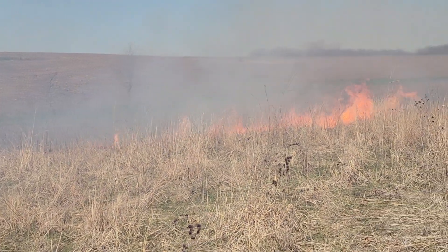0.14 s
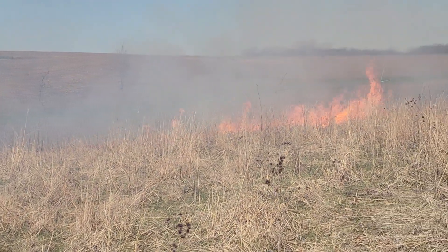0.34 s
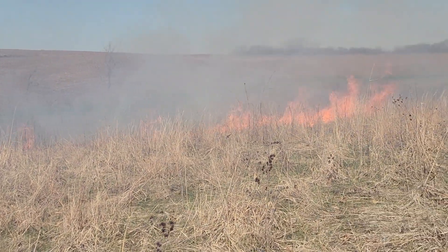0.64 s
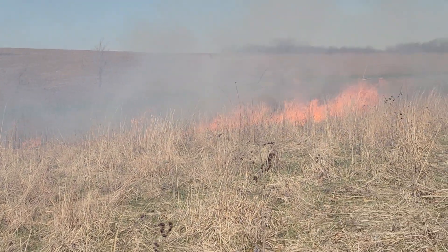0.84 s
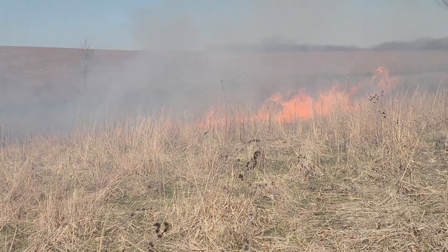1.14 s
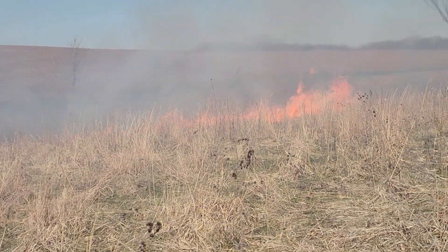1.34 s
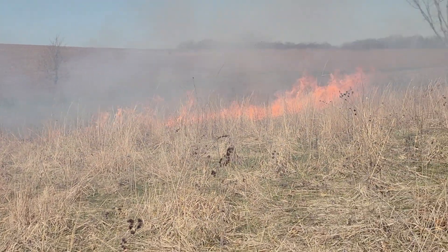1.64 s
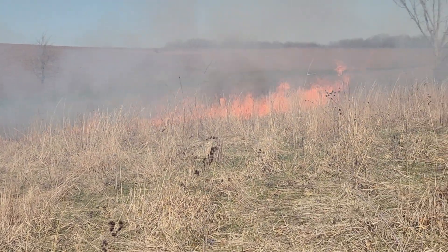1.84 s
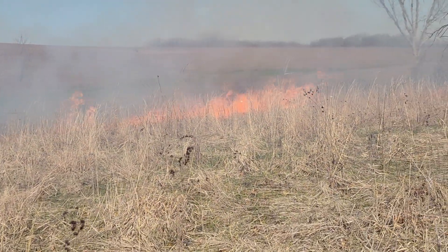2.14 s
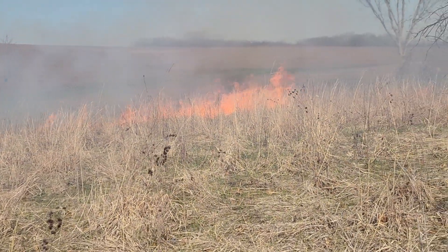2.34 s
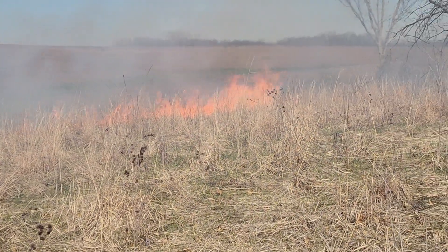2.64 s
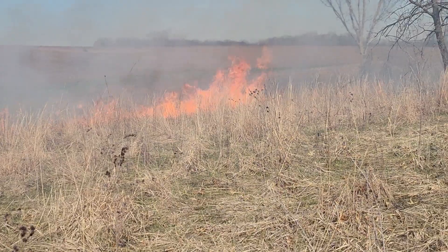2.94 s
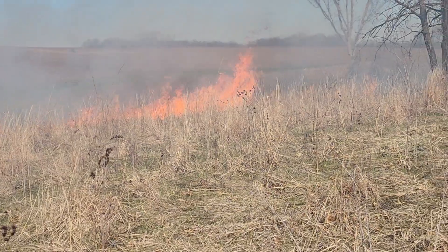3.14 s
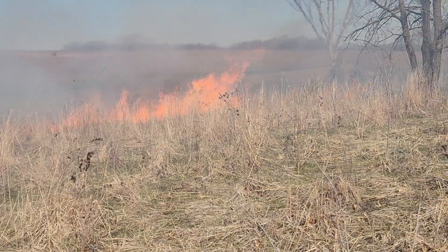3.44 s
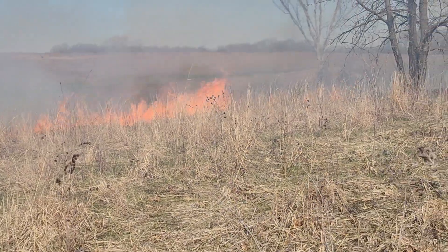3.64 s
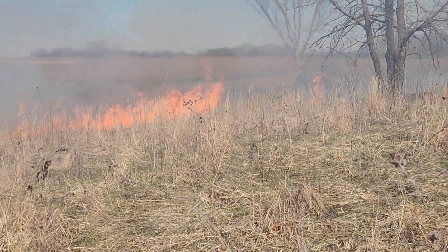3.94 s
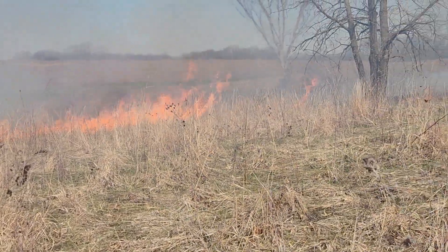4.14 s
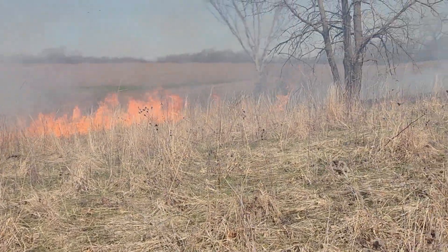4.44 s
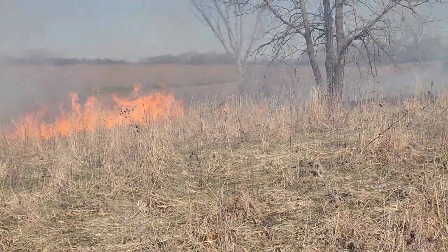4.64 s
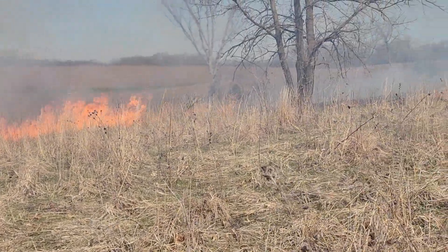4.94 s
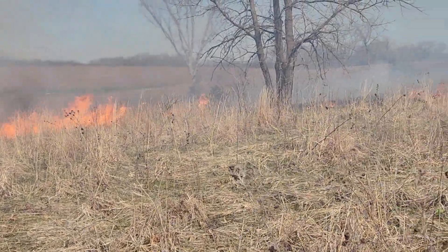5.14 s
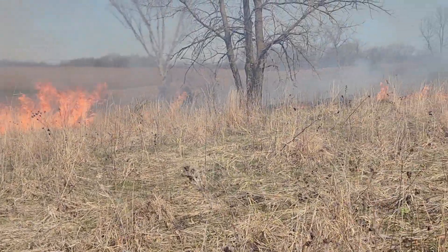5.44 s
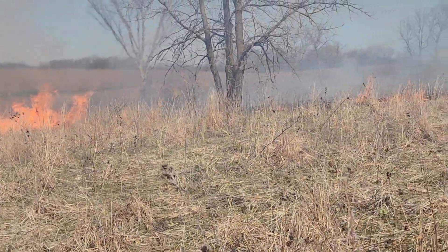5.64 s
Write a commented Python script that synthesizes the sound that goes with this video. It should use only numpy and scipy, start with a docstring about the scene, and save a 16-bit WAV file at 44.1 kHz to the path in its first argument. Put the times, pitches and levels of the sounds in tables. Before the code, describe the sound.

Thin dry stems tick, snap and splinter without pause, the pops leaning slightly right. Bright hiss swells near 1.7 seconds, then the popping thins before a low gust flutters across the microphone around three seconds. Hard snaps cluster from four to five seconds, followed by a dull rustling crumple. Low roar, wind and a weak faraway engine hum continue underneath, outdoors with no room echo.

```python
"""Grass fire in an open field

Dry stems burst in sharp pops: click and splinter showers, rung by a peak filter and tilted in spectrum.
Dense crackle, fine sizzle, hissing tufts and a dark rustle are streams of ticks, coloured by two ports.
Flame roar, wind, buffets, a gust and the field's hush are shaped noise.
A far engine speeds up as a few sine orders; a faint low sine drone sinks away at the start."""
import sys
import numpy as np
from scipy import signal
from scipy.fft import rfft, irfft
from scipy.io import wavfile
from scipy.ndimage import uniform_filter1d, map_coordinates

SR = 44100
rng = np.random.default_rng(int(sys.argv[2]) if len(sys.argv) > 2 else 0)


def dump_mix(stems):
    """Bounce the given channels to the path in sys.argv[1] as a 16-bit WAV at rate SR."""
    frames = np.atleast_2d(stems).T  # one column per channel
    limited = np.clip(frames, -1, 1)  # hard clip at full scale
    pcm = np.round(limited * 32767).astype(np.int16)
    wavfile.write(sys.argv[1], SR, pcm)


N = 255780
TIME_S = np.arange(N) / SR

# near stems: break t/s, relative crack peak/dB, target knock/dB, target body/dB, target snap/dB,
# ring f/Hz, splinter decay/s, left minus right/dB
NEAR_STEMS = [(0.1, -21, -36.5, -37, -46, 1150, 0.0021, -7), (0.2232, -32, -37, -38, -56, 2060, 0.0029, -3),
              (0.2454, -22, -46, -41, -51, 3100, 0.001, -7),
              (0.2537, -10.5, -36, -33.5, -39, 3480, 0.0026, -5),
              (0.3286, -19, -36.5, -31.5, -41.5, 2840.0, 0.0028, -3),
              (0.3394, -24, -39.5, -30.5, -40, 3330, 0.0013, -15),
              (0.373, -15, -41, -29, -64, 2850, 0.00064, -10),
              (0.4262, -26, -36.5, -38.5, -47, 2780, 0.0045, -8),
              (0.5345, -15, -46, -31, -36, 2955, 0.0046, -8),
              (0.5773, -29, -37, -35, -35, 3150, 0.0071, -6),
              (0.6983, -26, -52, -29.5, -39, 2840, 0.0038, -7),
              (0.7157, -22, -42, -32, -45, 3060, 0.0014, -7),
              (0.7298, -3, -34, -23.5, -37, 2870, 0.00078, -9),
              (0.8024, -24, -33, -38, -32.5, 7410.0, 0.0019, -7),
              (0.8093, -8, -25, -25.5, -22.5, 3270, 0.0029, -4),
              (0.8525, -26, -53, -34.5, -42, 2740, 0.00074, -8),
              (0.8974, -1, -51, -34, -34, 5340.0, 0.0023, -5),
              (0.9091, -10, -44, -29, -62, 2655, 0.00048, -6),
              (0.9504, -18, -55, -47, -55, 3000, 0.0012, -6),
              (0.9641, -16, -46, -35, -59, 2800, 0.0027, -13),
              (0.9823, -8, -34.5, -29.5, -33.5, 2960, 0.0018, -8),
              (1.0209, -22, -44, -34, -63, 2750, 0.0011, -5),
              (1.1349, -17, -40, -35.0, -64, 3360, 0.002, -7),
              (1.1608, -29, -48, -42, -33.5, 5120.0, 0.00083, -11),
              (1.2011, -6.5, -28, -22.5, -35, 2650, 0.0012, -10),
              (1.2074, -14, -30.5, -32, -38, 2800, 0.00096, -12),
              (1.2866, -6.5, -29.5, -27, -36, 2580, 0.0013, -8),
              (1.2926, -14, -45, -35, -48, 2570, 0.00035, -16),
              (1.312, -21, -55, -47, -39, 4700, 0.0012, -9),
              (1.3643, -12.5, -30, -29.5, -33, 3270, 0.004, -10),
              (1.3863, -18, -37.5, -39, -62, 1443, 0.0025, -5),
              (1.411, -24, -53, -59, -33, 7000, 0.00086, -11),
              (1.4683, -20, -41, -40.5, -60, 2580.0, 0.0012, -10),
              (1.5052, -9, -35.5, -32, -45, 2570, 0.0011, -8),
              (1.5343, -30, -49, -41, -42, 4780, 0.0009, -9),
              (1.5584, -30, -49, -35.5, -45, 4340, 0.0021, -2),
              (1.6249, -18, -43, -37, -39, 3060.0, 0.0025, -5),
              (1.6446, -19, -36, -35, -35, 2940, 0.00089, -8.5),
              (1.6646, -11.5, -40, -31.5, -38, 3300, 0.0027, -4),
              (1.6739, -17, -43, -34.5, -54, 3895, 0.001, -6),
              (1.7024, -9, -40, -31, -46, 2990.0, 0.00075, -5),
              (1.7704, -15, -52, -35, -44, 2840, 0.001, -4),
              (1.7822, -2, -38, -29.5, -36, 2970.0, 0.0013, -4),
              (1.8346, -21, -36.5, -33, -43, 2170, 0.0017, -4),
              (1.9567, -19, -42, -36.5, -49, 2698, 0.0012, -5),
              (2.0526, -13, -39, -31.5, -56, 2834, 0.0014, -7),
              (2.0904, -16, -42, -40, -54, 3520, 0.0011, -5),
              (2.1131, -23, -58, -41, -42, 2970, 0.00065, -3),
              (2.1399, -11, -44, -37.5, -39, 6145, 0.0042, -7),
              (2.355, -30, -38, -39, -43, 3360, 0.0022, -6), (2.4887, -26, -46, -36, -41, 3317, 0.0021, -9),
              (2.5048, -21, -45, -38, -46, 3130, 0.00086, -7),
              (2.6172, -23, -43, -32, -41, 2600, 0.0011, -9.0),
              (2.6474, -29, -37, -34.5, -38, 3030, 0.0041, -8),
              (2.7161, -26, -39.5, -40, -47, 2862, 0.001, -9),
              (2.7892, -21, -47, -36, -51, 2710, 0.001, -7),
              (2.8139, -17, -46, -35, -47, 3100, 0.00081, -11),
              (2.8563, -4.5, -32.5, -35.5, -28, 3200, 0.0032, -15),
              (2.9155, -11, -40, -32, -55, 4026, 0.0006, -8),
              (2.9204, -20, -39, -31, -39, 2540, 0.0047, -11),
              (2.9311, -17, -53, -40, -46, 3490, 0.001, -6),
              (2.9375, -11, -39, -34.0, -48, 2820, 0.00069, -6),
              (3.0275, -12, -45, -37, -38, 3320, 0.0007, -11),
              (3.0357, -6, -32, -35, -35, 2290, 0.0005, -9), (3.0601, -14, -38, -37, -39, 3940, 0.0019, -7),
              (3.1123, -12, -43, -45, -45, 4500, 0.00098, -9),
              (3.134, -24, -45, -38, -57, 2900, 0.00081, -10),
              (3.1548, -14, -40, -42, -39, 3100, 0.0016, -11),
              (3.1616, -11, -46, -32, -46, 2974, 0.0011, -6),
              (3.2613, -15, -54, -41, -42, 2685, 0.00096, -4),
              (3.328, -20, -55, -37, -59, 3020, 0.00099, -10),
              (3.448, -18, -46, -39.5, -45, 2887, 0.0045, -7),
              (3.461, -36, -40, -38.5, -58, 1336, 0.0015, -10),
              (3.529, -42, -40, -39.5, -44, 1000, 0.0021, -3),
              (3.6149, -22, -45, -45, -40, 4480, 0.0017, -7),
              (3.7598, -8.5, -37, -31.5, -34, 2902, 0.0021, -11.5),
              (3.8646, -20, -39, -39.5, -42, 1399, 0.0041, -7),
              (3.9786, -9, -46, -34, -37, 3167, 0.0013, -8.5),
              (4.0127, -8, -46, -34, -39.5, 5180, 0.0015, -3),
              (4.0209, -19, -55, -40.5, -50, 3450, 0.00088, -9),
              (4.0561, -3, -43, -26.5, -40, 3702, 0.00056, -8.5),
              (4.088, -10, -55, -32.5, -44, 3200, 0.00079, -11),
              (4.098, -10, -33.5, -36.5, -49, 1950, 0.0012, -9),
              (4.1855, -28, -58, -40.5, -39, 4460, 0.0023, -13),
              (4.2256, -9, -51, -42, -41, 2625, 0.00074, -17),
              (4.2419, -24, -36.5, -36.5, -34, 5070, 0.0032, -6.5),
              (4.2776, -19, -51, -41, -47, 3010, 0.0011, -12),
              (4.3084, -14, -44, -41, -35, 4705, 0.00085, -13),
              (4.3374, -17, -34.5, -30, -35.5, 3050, 0.0021, -9),
              (4.3495, -1, -37, -24, -34, 3740, 0.00044, -4), (4.3696, -15, -59, -39, -42, 3413, 0.001, -9),
              (4.4133, -17, -46, -34.5, -41, 2287, 0.00067, -8),
              (4.4568, -21, -47, -37.5, -34, 7300, 0.0047, -7),
              (4.4785, -18, -49, -35, -36, 4034, 0.00078, -8),
              (4.508, -8, -40, -30.0, -32.5, 3140, 0.00074, -10.5),
              (4.5751, -6, -40, -31, -38, 3530, 0.0053, -11),
              (4.5815, -12, -45, -31, -37, 2970, 0.0011, -12),
              (4.5881, -3, -41, -23, -31, 3765, 0.00051, -10.5),
              (4.612, -26, -41, -34, -35, 3550, 0.0061, -8),
              (4.6665, -23, -58, -38, -46, 3100, 0.0012, -14),
              (4.7013, -17, -57, -32, -43, 3190.0, 0.001, -7),
              (4.7197, -21, -32, -23, -35, 3700, 0.00082, -8),
              (4.7215, -6, -36, -39, -44, 3156, 0.00077, -12),
              (4.7237, -4, -37, -24.5, -34, 2930, 0.002, -10),
              (4.7469, -6.5, -39.5, -24, -33.5, 3925, 0.001, -10),
              (4.808, -30, -45, -36, -41, 4004, 0.004, -6), (4.848, -30, -44, -41, -39, 3840, 0.0019, -6),
              (4.878, -21, -40, -32.5, -41, 3780, 0.0054, -11.0),
              (4.8902, -16, -45, -39, -52, 2780, 0.001, -5), (4.9312, -18, -31, -34, -43, 3320, 0.0045, -8),
              (4.9773, -25, -36.5, -36, -43.5, 1584, 0.0038, -7.0),
              (5.0016, -37, -30.5, -36, -45, 1980, 0.0025, -9),
              (5.0204, -15, -29.5, -42, -48, 2030, 0.00095, -9),
              (5.117, -40, -35, -53, -55, 2195, 0.0023, -12),
              (5.1879, -9, -25, -34, -49, 2900, 0.0014, -11),
              (5.2697, -19, -48, -40, -43, 3454, 0.00048, -6),
              (5.3778, -19, -54, -34, -45, 4705, 0.00049, -8),
              (5.4344, -18, -67, -35, -43, 4330, 0.0048, -7),
              (5.4567, -11, -42, -34, -42, 4090, 0.0016, -9),
              (5.5073, -13, -50, -36, -43, 3230, 0.005, -18),
              (5.5166, -16, -50, -34, -44, 4550, 0.00091, -7),
              (5.5449, -23, -59, -35, -55, 4170, 0.00069, -16),
              (5.5826, -22, -45, -41, -56, 3700, 0.002, -10),
              (5.6195, -15, -37, -35, -46, 2940, 0.0014, -13),
              (5.6401, -7, -36, -23.5, -45, 3320, 0.0042, -11),
              (5.6671, -12, -45, -40, -42, 3050, 0.0012, -3),
              (5.7855, -20, -38, -32, -41, 3220, 0.0057, -9)]
# knock, body and snap bands of a pop: low f/Hz, high f/Hz
POP_BANDS_HZ = [(1000, 2300), (2300, 5500), (5500, 15500)]
# how hard the grass burns: t/s, relative crackle level/dB
BURN = [(0.0, -41), (0.64, -39), (0.84, -37), (1.65, -42.5), (1.87, -44), (2.31, -37), (2.42, -43),
        (3.02, -37), (3.21, -40.5), (3.96, -43), (4.82, -37.5), (5.07, -38), (5.17, -38.5), (5.8, -39)]
# far engine: t/s, mean firing f/Hz, relative level/dB
ENGINE_RUN = [(0, 85.4, -36.5), (.2, 82.3, -35.5), (.33, 80.95, -32), (.42, 80.8, -34.5), (.6, 85.16, -29),
              (.82, 90.8, -38), (1.0, 90.35, -37), (1.3, 91.25, -45), (1.45, 92.6, -27.5),
              (1.62, 95.6, -35.5), (1.72, 93, -32.5), (1.87, 92.6, -36), (2.1, 92.6, -39.5),
              (2.8, 106, -39), (3.25, 104.4, -39), (3.48, 106.4, -31), (3.8, 113.4, -42),
              (4.0, 119.4, -35.5), (4.3, 120.7, -42.5), (4.8, 131.3, -39), (5.1, 134.3, -49),
              (5.8, 140.7, -50)]
# engine orders: multiple of firing rate, relative level/dB
ENGINE_ORDERS = [(1, -1), (1.5, -13), (2, -20)]
# sinking drone: t/s, f/Hz, level/dB
DRONE = [(0, 260.7, -49), (.15, 242.2, -45), (.27, 222.8, -45.5), (.4, 213, -44.5), (.48, 210, -72)]
# colour of the microphone ports: f/Hz, gain/dB
LEFT_PORT = [(200, -14), (800, -10.5), (1400, -4), (2100, -15), (2900, -7.5), (4000, -12), (5500, -9),
             (7600, -6.5), (8600, -14.5), (10000, -22.5), (12500, -14), (15500, -26)]
RIGHT_PORT = [(200, -19), (800, -10.5), (1400, -5), (2050, -1), (3000, 3.5), (3900, -2.5), (4700, 0.5),
              (5500, -13), (7600, -22), (9000, -36), (10300, -21), (11700, -12), (13000, -13), (15500, -28)]
# source spectra: f/Hz, relative level/dB
CRACKLE_TONE = [(300, -2), (1000, 8), (2000, 1.5), (3000, 2.5), (6000, 1.5), (15000, 6)]
SIZZLE_TONE = [(500, -36), (2000, -5.5), (5000, 0), (8000, 0.5), (11000, -4), (15000, 6.5)]
FLARE_TONE = [(1000, -16.5), (3000, -8), (6000, -2), (9000, -2.5), (12000, 4), (15500, 5.5)]
RUSTLE_TONE = [(300, -8), (900, 4.5), (1500, -3), (3000, 4), (5000, 1), (12000, -3)]
WIND_TONE = [(15, -52), (28, -11.5), (42, -0.5), (65, 1), (85, 0.5), (110, -7), (150, -19), (400, -74)]
ROAR_TONE = [(50, -16), (90, 0), (130, 1), (200, -4), (280, -10.5), (400, -19.5), (600, -31.5), (900, -39),
             (2000, -74)]
GUST_TONE = [(60, -3), (150, 6.5), (240, 0), (350, -7), (550, -12.5), (800, -24), (2000, -64)]
FIELD_TONE = [(150, 3.5), (300, -10.5), (550, 7), (850, -4), (1500, -2.5), (3000, 0), (6000, -14.5),
              (12000, -40)]
# tufts flaring up: peak t/s, rise sigma/s, fall sigma/s, relative level/dB
FLARES = [(1.65, 0.18, 0.38, -43.5), (5.65, 0.059, 0.079, -40.5)]
# clump of thick stalks burning: peak t/s, rise sigma/s, fall sigma/s, relative level/dB
RUSTLES = [(4.97, 0.063, 0.044, -36.5), (5.159, 0.032, 0.066, -38)]
# eddies thumping the microphone: peak t/s, sigma/s, relative level/dB
BUFFETS = [(0.226, 0.031, -36), (0.37, 0.01, -24.5), (0.828, 0.028, -24), (0.94, 0.018, -28),
           (1.098, 0.015, -21), (2.091, 0.032, -33.5), (2.735, 0.019, -27), (2.81, 0.012, -31),
           (2.867, 0.028, -26.5), (3.004, 0.033, -23.5), (3.103, 0.01, -17.5), (3.21, 0.03, -28),
           (3.787, 0.039, -27), (4.199, 0.041, -28.5), (4.513, 0.034, -29), (5.419, 0.11, -32)]
# long gust: t/s, relative strength/dB
GUST = [(2.6, -17), (2.68, -5.5), (2.73, 4), (2.77, 0), (2.82, 5), (2.92, -13), (2.98, -0.5), (3.06, -7),
        (3.11, 4), (3.2, 1.5), (3.28, -6.5), (3.33, 7.5), (3.39, -10), (3.5, -52), (3.7, -60)]

LEAD_S, GROUND_LAG_S = .004, .00143  # fibre tearing before the break; bounce off the ground
LESSER_DB, LESSER_SPREAD_DB = (-51, -46.5, -47), (1, 9.5, 8)  # knock, body, snap
SIZZLE_DB, SIZZLE_FOLLOWS = -51, 0.091  # level; share of the burn's dB changes
ROAR_DB, ROAR_FADE_DB_PER_S = -38, 0.24
FANNED_DB_PER_GAIN = 1.5  # roar boost per unit of gust gain
GUST_DB, BREEZE_DB, FIELD_DB = -35.5, -37, -49
TOP_HZ = 16000


def undb(db):
    """Decibels to gain."""
    return 10 ** (np.asarray(db) / 20)


def rms(x):
    """Root mean square."""
    return np.sqrt(np.mean(x ** 2)) + 1e-12


def curves(table):
    """Columns of a timed table, interpolated per sample."""
    t_s, *columns = np.transpose(table)
    return [np.interp(TIME_S, t_s, column) for column in columns]


def band(x, low_hz, high_hz):
    """Causal band-pass."""
    return signal.sosfilt(signal.butter(2, [low_hz, high_hz], "band", fs=SR, output="sos"), x)


def response(points, size=512):
    """Minimum-phase impulse response through (f/Hz, dB) points, by folding the cepstrum."""
    hz, db = np.transpose(points)
    grid_hz = np.maximum(np.arange(size // 2 + 1) * SR / size, 1)
    grid_db = np.interp(np.log(grid_hz), np.log(hz), db)
    cepstrum = irfft(np.log(undb(grid_db)))
    cepstrum[1:size // 2] *= 2
    cepstrum[size // 2 + 1:] = 0
    return irfft(np.exp(rfft(cepstrum)))


def colour(x, points, size=512):
    """Filter a stereo sound through (f/Hz, dB) points."""
    return signal.oaconvolve(x, response(points, size=size)[None], axes=1)[:, :x.shape[1]]


def walk(knots_per_s):
    """Smooth random wander of about unit spread: splined random knots."""
    knots = rng.standard_normal(512)
    return map_coordinates(knots, [TIME_S * knots_per_s], order=3, mode="wrap")


def swell(at_s, rise_s, fall_s):
    """Gaussian rise to 1 and Gaussian fall."""
    sigma_s = np.where(TIME_S < at_s, rise_s, fall_s)
    return np.exp(-((TIME_S - at_s) / sigma_s) ** 2 / 2)


def swells(table):
    """Summed gain of (t/s, rise/s, fall/s, dB) swells."""
    return sum(undb(db) * swell(at_s, rise_s, fall_s) for at_s, rise_s, fall_s, db in table)


def ports(ground_db=-11):
    """Way to the two ports: direct sound plus ground bounce, coloured by each port."""
    direct = np.array([response(LEFT_PORT), response(RIGHT_PORT)])
    lag = int(GROUND_LAG_S * SR)
    bounce = np.pad(direct, ((0, 0), (lag, 0)))[:, :direct.shape[1]]
    return direct + undb(ground_db) * bounce


def heard(x, way):
    """Sound after its way to the two ports."""
    return signal.oaconvolve(x, way, axes=1)[:, :x.shape[1]]


def clicks(times_s, sizes, length, spread_s=.00013):
    """Clicks from scattered directions: random arrival lag between the ports."""
    out = np.zeros((2, length))
    half_lag_s = spread_s * rng.standard_normal(len(times_s)) / 2
    for channel, arrival_s in zip(out, (times_s - half_lag_s, times_s + half_lag_s)):
        at = np.clip(arrival_s * SR, 0, length - 1).astype(int)
        np.add.at(channel, at, sizes)
    return out


def crack(shade_db=-5, spread_s=.00004, size=2048):
    """Clean break of a stem, one click; the left port faces away and gets less."""
    click = clicks(np.array([LEAD_S]), rng.choice([-1., 1.], size=1), size, spread_s)
    return undb([[shade_db], [0]]) * click


def shower(decay_s, count, size=2048):
    """Click run dying away after the break, or swelling up to it if decay_s is negative."""
    span_s = np.clip(4 * decay_s, -LEAD_S, size / SR - LEAD_S)
    times_s = rng.uniform(0, 1, count) * span_s
    sizes = rng.choice([-1, 1], count) * rng.uniform(0.089, 1, count) * np.exp(-times_s / decay_s)
    return clicks(times_s + LEAD_S, sizes / np.linalg.norm(sizes), size)


def splinters(splinter_s, tear_db, echo_db, tear_s=0.0021, echo_s=0.007):
    """Fibres tear before the break and splinter after it; the grass around scatters an echo."""
    tearing = undb(tear_db) * shower(-tear_s, count=12)
    splintering = shower(max(splinter_s, .0003), count=30)
    echo = undb(echo_db) * shower(echo_s, count=120)
    return tearing + splintering + echo


def stem(x, ring_hz, ring_db=5, sharpness=8.3):
    """The hollow stem rings briefly: a resonant peak added to its break."""
    b, a = signal.iirpeak(np.clip(ring_hz, 700, 12000), sharpness, fs=SR)
    return x + undb(ring_db) * signal.lfilter(b, a, x)


def crackle(way, burn_db, scatter_db=8.0, most_db=13, flurry_s=.02, level_db=-5.0, kinds=48):
    """Hundreds of thin stems a second tick in flurries along the fire line, most faint, a few strong."""
    out = 0
    tufts = rng.uniform(0, N, size=700)  # each burning tuft can set off several stems
    for _ in range(kinds):
        train = np.zeros(N)
        delay = flurry_s * SR * rng.exponential(size=70)
        at = (rng.choice(tufts, size=70) + delay).astype(int) % N
        train[at] = undb(np.minimum(scatter_db * rng.standard_normal(len(at)), most_db))
        snap = splinters(splinter_s=.0008, tear_db=0.5, echo_db=-5) + undb(4) * crack()
        tick = stem(snap, 3300 * np.exp(0.556 * rng.standard_normal()))
        out = out + signal.oaconvolve(train[None], tick / rms(tick), axes=1)[:, :N]
    out = heard(colour(out, CRACKLE_TONE), way)
    return out * undb(burn_db + level_db) / rms(band(out.mean(0), *POP_BANDS_HZ[1]))


def ticks(way, tone, scatter_db, count):
    """Many tiny clicks at random times, coloured and carried to the ports."""
    sizes = rng.choice([-1, 1], count) * undb(scatter_db * rng.standard_normal(count))
    scattered = clicks(rng.uniform(0, N / SR, count), sizes, N)
    return heard(colour(scattered, tone), way)


def fizz(way, tone, db, scatter_db, flicker_db):
    """Dense flickering ticks, levelled in the snap band."""
    out = ticks(way, tone, scatter_db, count=40000)
    return out * undb(db + flicker_db * walk(60)) / rms(band(out.mean(0), *POP_BANDS_HZ[2]))


def sizzle(way, burn_db):
    """Fine blades and seed fluff burn in tiny ticks, slightly following the burn."""
    db = SIZZLE_DB + SIZZLE_FOLLOWS * (burn_db - burn_db.mean())
    return fizz(way, SIZZLE_TONE, db, scatter_db=4.5, flicker_db=2.5)


def turbulence(tone, db, side_db, flutter_db, flutter_rate):
    """Eddying air: coloured noise common to both ports plus opposed side noise, fluttering in level."""
    mid, side = colour(rng.standard_normal((2, N)), tone, size=8192)
    out = (mid + undb(side_db) * side * np.array([[1], [-1]])) / rms(mid)
    return out * undb(db + flutter_db * walk(flutter_rate))


def roar(gust_gain):
    """Flames roar in low noise, fading as the microphone turns away, louder when the gust fans them."""
    db = ROAR_DB - ROAR_FADE_DB_PER_S * TIME_S + FANNED_DB_PER_GAIN * gust_gain
    return turbulence(ROAR_TONE, db, side_db=-5.0, flutter_db=1.23, flutter_rate=14)


def breeze():
    """Steady wind on the microphone as low fluttering noise."""
    return turbulence(WIND_TONE, BREEZE_DB, side_db=-5.0, flutter_db=1.5, flutter_rate=13.0)


def field():
    """Hush of the open field as quiet noise."""
    return turbulence(FIELD_TONE, FIELD_DB, side_db=-4.5, flutter_db=1.7, flutter_rate=5.3)


def engine(flutter_db=3.5):
    """Only the lowest exhaust orders carry across the field, wavering in the wind."""
    hz, db = curves(ENGINE_RUN)
    phase = 2 * np.pi * np.cumsum(hz * (1 + .005 * walk(12))) / SR
    tone = 0
    for multiple, order_db in ENGINE_ORDERS:
        tone = tone + undb(order_db + flutter_db * walk(6)) * np.sin(multiple * phase)
    return np.sqrt(2) * tone * undb(db)


def drone():
    """Faint far sine that sinks in pitch and is gone."""
    hz, db = curves(DRONE)
    tone = np.sin(2 * np.pi * np.cumsum(hz) / SR)
    return np.sqrt(2) * undb(db) * tone * (TIME_S < DRONE[-1][0])


def placed(x, balance_db):
    """Place a stem along the fire line by its level balance between the ports."""
    left, right = (rms(band(side, 2300, 9000)) for side in x)
    return x * np.sqrt(undb(balance_db) * right / left) ** np.array([[1], [-1]])


def voiced(x, levels_db, thin_hz=600, thin_db=-9, size=620):
    """Tilt a pop towards its early knock, body and snap levels; a thin stem radiates little bass."""
    now_db = [20 * np.log10(rms(band(x.mean(0), lo, hi)[:size])) for lo, hi in POP_BANDS_HZ]
    centres_hz = np.sqrt(np.prod(POP_BANDS_HZ, axis=1))
    tilt_db = levels_db - now_db
    return colour(x, [(thin_hz, tilt_db[0] + thin_db), *zip(centres_hz, tilt_db)])


def pop(way, peak_db, knock_db, body_db, snap_db, ring_hz, splinter_s, balance_db):
    """One stem bursts: a sharp crack takes a share of the energy, a spray of splinters the rest."""
    levels_db = np.array([knock_db, body_db, snap_db])
    ring_db = np.interp(splinter_s, [.0005, .0009], [-1.5, 4.5])  # the cleanest breaks hardly ring
    sharp = heard(stem(crack(), ring_hz, ring_db), way)
    sharp = voiced(placed(sharp, balance_db), levels_db + [0, 0, -1])
    spray = heard(stem(splinters(splinter_s, tear_db=-2.5, echo_db=0.5), ring_hz), way)
    spray = voiced(placed(spray, balance_db), levels_db)
    wanted_peak = undb(peak_db - 4.5)
    share = min((wanted_peak / abs(sharp.mean(0)).max()) ** 2, 0.8)
    return np.sqrt(share) * sharp + np.sqrt(1 - share) * spray


def lesser_stems(count=50, crest_db=14, ring_hz=3100, splinter_s=0.0018):
    """Weaker stems burst at random, each with its own colour and place; columns as NEAR_STEMS."""
    times_s = rng.random(count) * N / SR
    chance = np.clip(rng.standard_normal((count, 5)), -2, 2)
    knock_db, body_db, snap_db = (LESSER_DB + LESSER_SPREAD_DB * chance[:, :3]).T
    rings_hz = ring_hz * np.exp(0.52 * chance[:, 3])
    balances_db = -6 + 3 * chance[:, 4]
    return np.column_stack([times_s, body_db + crest_db, knock_db, body_db, snap_db, rings_hz,
                            np.full(count, splinter_s), balances_db])


def pops(way):
    """Near and lesser stems each burst at their moment."""
    out = np.zeros((2, N + SR))
    for break_s, *settings in np.vstack([NEAR_STEMS, lesser_stems()]):
        burst = pop(way, *settings)
        start = max(int((break_s - LEAD_S) * SR), 0)
        out[:, start:start + burst.shape[1]] += burst
    return out[:, :N]


def buffets():
    """Single eddies thump the microphone: evened-out wind noise in short swells."""
    eddies = turbulence(WIND_TONE, db=0, side_db=-8, flutter_db=0, flutter_rate=1)
    strength = np.sqrt(uniform_filter1d((eddies ** 2).mean(0), size=1500))
    thumps = swells([(at_s, sigma_s, sigma_s, db) for at_s, sigma_s, db in BUFFETS])
    return eddies / strength * thumps


def flares(way):
    """Whole tufts flare up in swells of bright hiss made of ticks."""
    return swells(FLARES) * fizz(way, FLARE_TONE, db=-3.0, scatter_db=5.0, flicker_db=3.5)


def gust(gust_gain):
    """A long gust tears at the ports: noise nearly alike in both, fluttering fast."""
    return gust_gain * turbulence(GUST_TONE, GUST_DB, side_db=-25, flutter_db=3.0, flutter_rate=50)


def rustle(way):
    """Thick stalks crumple in a clump: many dull ticks that blur together."""
    out = ticks(way, RUSTLE_TONE, scatter_db=5, count=5000)
    return out * swells(RUSTLES) / rms(out.mean(0))


def scene():
    """Fire in front, wind at the microphone, engine and drone far off in the field."""
    way = ports()
    burn_db, = curves(BURN)
    gust_gain = undb(curves(GUST)[0])
    fire = crackle(way, burn_db) + sizzle(way, burn_db) + pops(way) + flares(way) + rustle(way)
    air = roar(gust_gain) + breeze() + field() + buffets() + gust(gust_gain)
    return fire + air + engine() + drone()


def record(dry):
    """The recorder clips at full scale, then a steep low-pass cuts the top."""
    top_cut = signal.ellip(8, .2, 70, TOP_HZ, fs=SR, output="sos")
    return signal.sosfilt(top_cut, np.clip(dry, -1, 1))


dry = scene()
out = record(dry)
dump_mix(out)
```